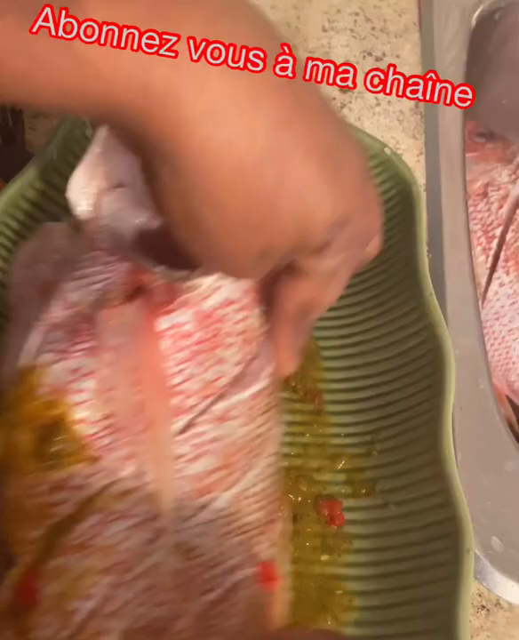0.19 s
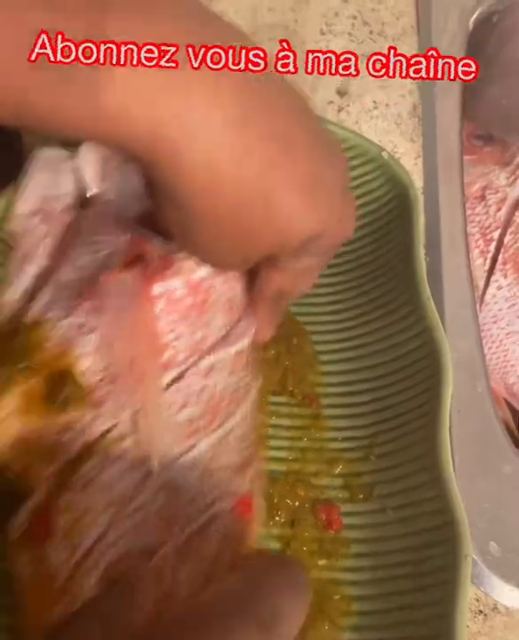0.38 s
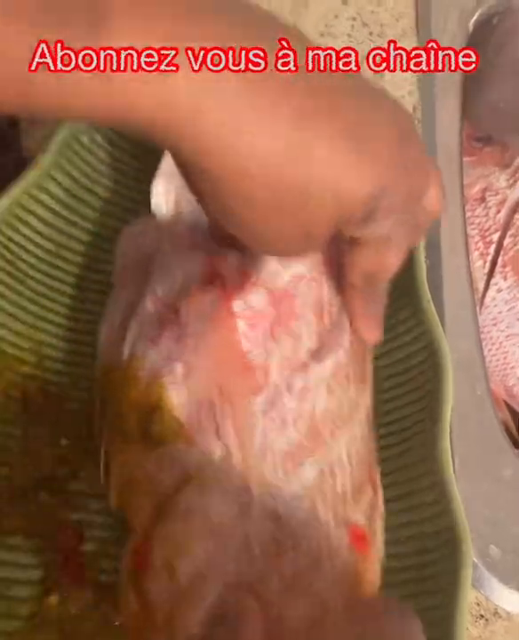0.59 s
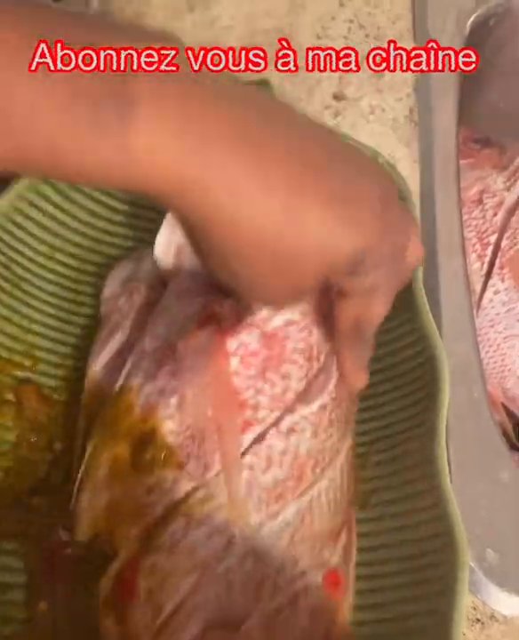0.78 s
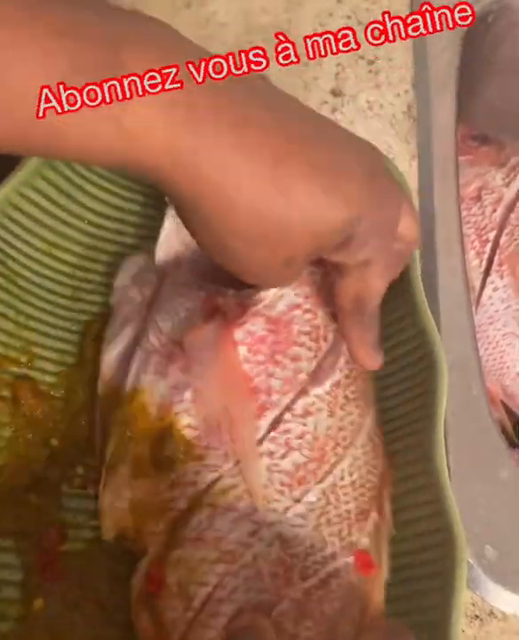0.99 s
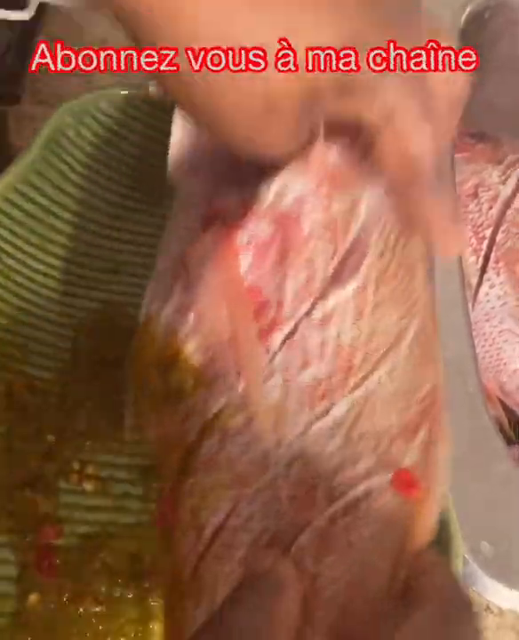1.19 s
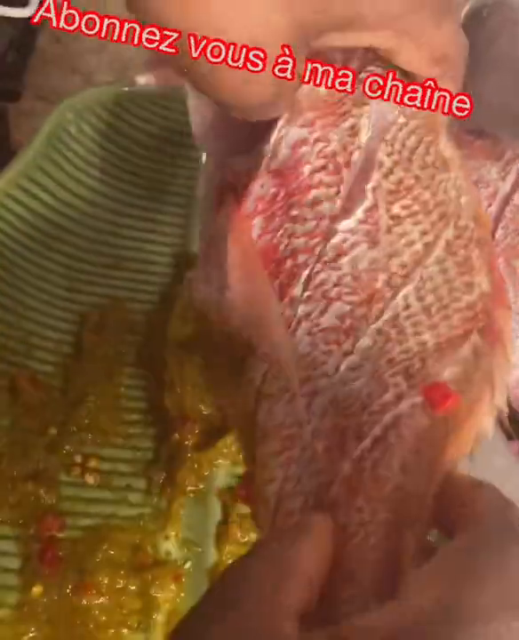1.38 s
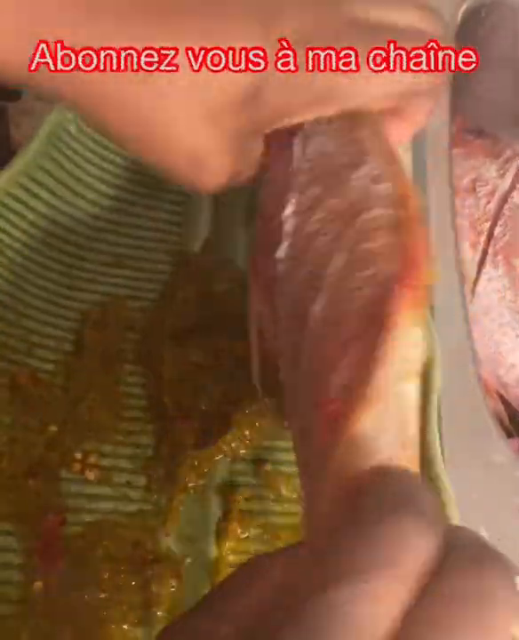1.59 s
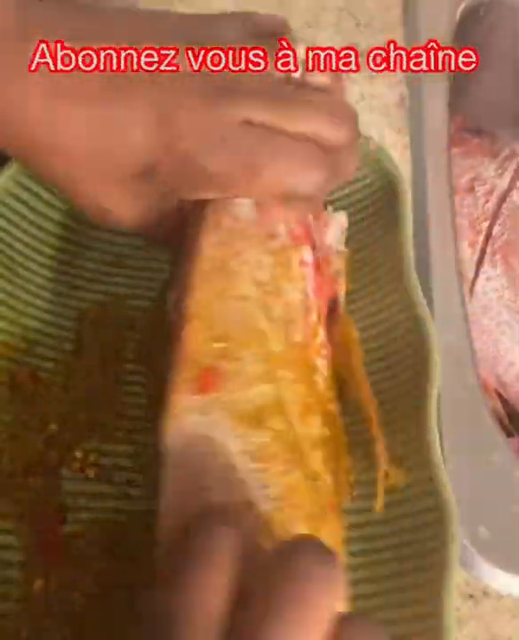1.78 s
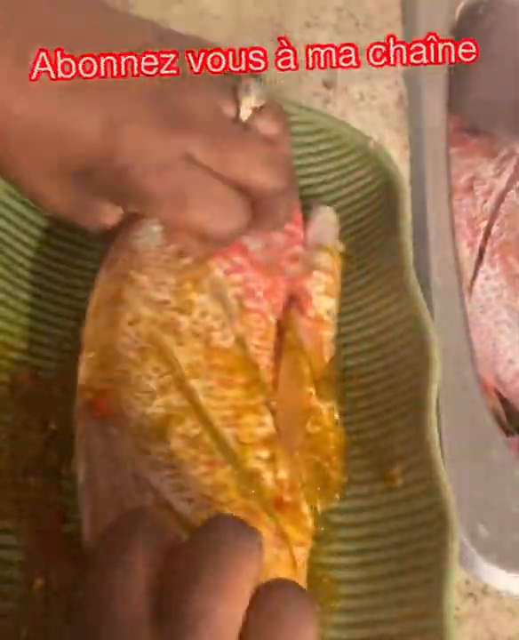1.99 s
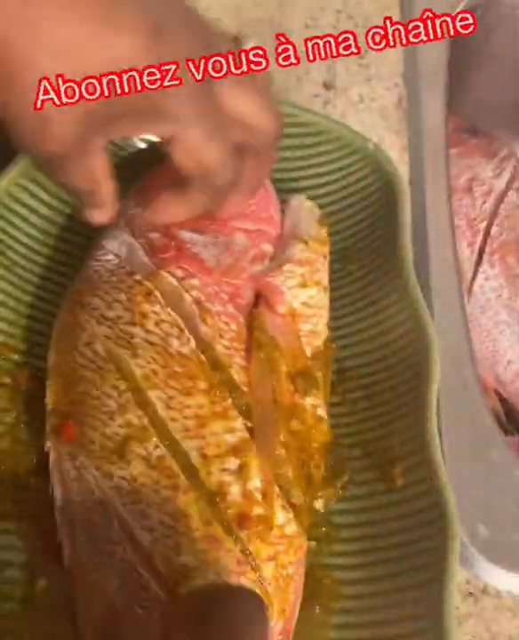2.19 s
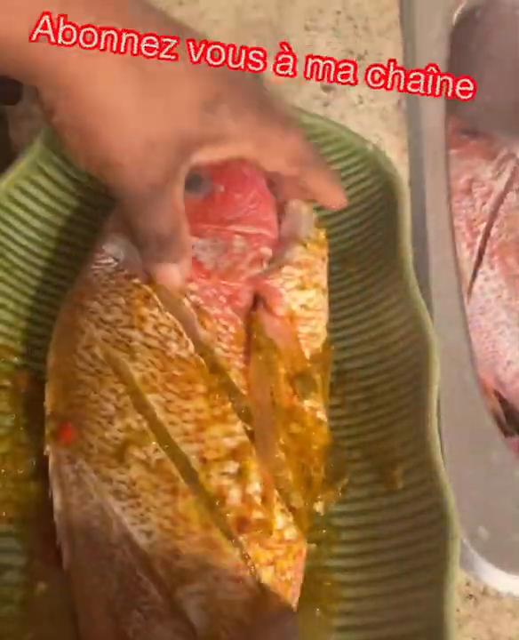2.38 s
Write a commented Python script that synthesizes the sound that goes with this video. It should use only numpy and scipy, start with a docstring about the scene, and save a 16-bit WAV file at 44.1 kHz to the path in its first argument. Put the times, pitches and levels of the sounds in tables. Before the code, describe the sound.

Wet, sticky squelching of a paste-covered fish handled on a plastic tray, close up in a small kitchen. A crisp squelch with pops comes at 0.2 s, a hollow tray knock with brief rattle at 0.3, the strongest juicy smack at 0.6, a short snap at 0.9. Then quieter: tiny squeaks around 1.6-1.8, faint clicks, a small wet pop at 2.1. Low hum and rumble continue throughout.

```python
"""A wet, paste-covered fish is shifted and turned over on a plastic tray in a small kitchen.
Air pockets pop (decaying sines), the sticky film snaps (noise bursts) and crackles (random rings),
the paste hisses (noise bands) and wet slits squeak (gliding tones). The tray knocks on the counter
(ringing modes) and rattles (noise); a motor hums (sines) over low room rumble and faint recorder
hiss (noise bands). Echoes are a noise tail; the microphone is a two-port phone."""
import sys
import numpy as np
from scipy import signal
from scipy.io import wavfile
from scipy.ndimage import uniform_filter1d

SR = 44100
rng = np.random.default_rng(int(sys.argv[2]) if len(sys.argv) > 2 else 0)


def to_wav(sig):
    """Store sig (one row per channel, or 1-D mono) as 16-bit WAV at the path in sys.argv[1].

    Samples outside -1..1 are clipped; the rate is SR.
    """
    pcm = np.clip(np.atleast_2d(sig), -1, 1) * 32767
    pcm = np.round(pcm).astype(np.int16)
    wavfile.write(sys.argv[1], SR, pcm.T)  # frames by channels


N = 110250
HALF_EACH_WAY = np.array([[0.5], [-0.5]])  # splits a left-right difference in dB

# tray rocks on the counter: t/s, relative level/dB, contact cut-off f/Hz
BLOWS = [(.294, -23, 3000), (.2975, -22.5, 342), (.301, -16, 800), (.307, -25.5, 498), (0.323, -29.5, 877),
         (.334, -32.5, 710), (.350, -30.5, 700), (0.394, -36, 400), (.628, -48.5, 896), (.910, -50, 600),
         (1.644, -46, 910), (2.306, -45.5, 300)]


def from_db(db):
    """dB to gain."""
    return 10 ** (np.asarray(db) / 20)


def rms_one(x):
    """Scale to rms 1."""
    return x / np.sqrt(np.mean(x ** 2) + 1e-20)


def in_time(rows):
    """Interpolate (s, dB) rows to a level in dB for every sample."""
    return np.interp(np.arange(N) / SR, *np.transpose(rows))


def at_hz(points, hz):
    """Read a spectrum on a log frequency axis."""
    points_hz, values = np.transpose(points)
    return np.interp(np.log(hz), np.log(points_hz), values)


def drift(corner_hz):
    """Noise through two equal poles, computed at SR / 40: slow chance of rms 1."""
    step, settle = 40, 2000
    r = np.exp(-2 * np.pi * corner_hz * step / SR)
    noise = rng.standard_normal(N // step + settle + 2)
    slow = signal.lfilter([1], [1, -2 * r, r * r], noise)[settle:]
    return np.interp(np.arange(N) / step, np.arange(len(slow)), rms_one(slow))


def ring(clicks, hz, t60_s):
    """Two-pole resonator: a unit click starts a decaying sine of initial height 1."""
    r = from_db(-60 / (t60_s * SR))
    w = 2 * np.pi * hz / SR
    return signal.lfilter([0, np.sin(w)], [1, -2 * r * np.cos(w), r * r], clicks + 1e-18)


def add(out, start_s, sound):
    """Mix a short sound in at a time."""
    i = int(start_s * SR)
    out[..., i:i + sound.shape[-1]] += sound[..., :N - i]


def banded(spectrum, flicker_db):
    """Third-octave stereo noise with set left-right likeness; bands share five flickers; rms 1."""
    # f/Hz, left-right correlation
    likeness = [(60, 1), (130, 0.79), (290, 0.76), (640, -0.058), (1410, 0.28), (3100, 0.21), (6820, 0.012),
                (15000, 0.14)]
    edges_hz = 22 * 2 ** np.arange(0, 9.7, 1 / 3)
    white = rng.standard_normal((2, 2, N + SR // 4))  # the extra 1/4 s lets the filters settle
    flickers = [drift(28) for _ in range(5)]
    out = 0
    for k, (low_hz, high_hz) in enumerate(zip(edges_hz, edges_hz[1:])):
        if low_hz <= spectrum[0][0]:
            continue
        band = signal.butter(2, [low_hz, high_hz], "band", fs=SR, output="sos")
        mid, side = signal.sosfilt(band, white[k % 2])[:, -N:]
        hz = np.sqrt(low_hz * high_hz)
        alike = at_hz(likeness, hz)
        gain = from_db(at_hz(spectrum, hz) + flicker_db * flickers[k // 2 % 5])
        out = out + gain * (np.sqrt(1 + alike) * mid + np.sqrt(1 - alike) * side * [[1], [-1]])
    return rms_one(out)


def noise_floor():
    """Low room rumble plus faint high recorder hiss: shaped noise bands, slightly stronger on the left."""
    # f/Hz, relative level/dB per Hz
    colour = [(20, -60), (32, -44), (50, -7.5), (75, -11), (120, -10.5), (160, -15.5), (250, -14.5),
              (380, -19), (500, -24), (900, -31), (1900, -42.5), (2800, -71.5), (6000, -67.5), (10000, -62),
              (16500, -56.5)]
    return from_db(-48.5) * banded(colour, flicker_db=0.48) * from_db([[0.4], [-0.4]])


def hum():
    """Motor hum: steady sines of random phase, slightly stronger on the left."""
    # f/Hz, rms level/dB before the left-right lean
    lines = [(59.2, -54.5), (86.1, -53), (118.4, -48.5), (220.7, -62), (355.3, -62.5)]
    t = np.arange(N) / SR
    total = 0
    for hz, db in lines:
        total = total + np.sqrt(2) * from_db(db) * np.sin(2 * np.pi * (hz * t + rng.random()))
    return total * from_db([[0.7], [-0.7]])


def kitchen(x):
    """Echoes: convolution with a decaying noise tail; bass common to both sides, treble dies sooner."""
    room_t60_s, treble_t60_s, rise_s = 0.32, 0.2, 0.0039
    wall_cut_hz, shared_bass_hz = 2400, 300
    t = np.arange(SR // 2) / SR
    noise = rng.standard_normal((2, len(t)))
    # swap the right side's bass for the left's
    bass = signal.lfilter(*signal.butter(2, shared_bass_hz, fs=SR), noise[0] - noise[1])
    noise[1] += bass
    low = signal.lfilter(*signal.butter(1, wall_cut_hz, fs=SR), noise)
    tail = low * from_db(-60 * t / room_t60_s) + (noise - low) * from_db(-60 * t / treble_t60_s)
    tail = tail * np.minimum(t / rise_s, 1)
    unit_tail = tail / np.sqrt(np.sum(tail ** 2) / 2)
    return signal.fftconvolve(x[None], unit_tail, axes=1)[:, :N]


def rattle():
    """Loose tray edge buzzes after each blow: decaying band noise, independent per side."""
    level_db, t60_s, band_hz = -1.5, 0.07, [550, 1720]
    out, t = np.zeros((2, N)), np.arange(4000) / SR
    for start_s, db, _ in BLOWS:
        noise = rng.standard_normal((2, len(t)))
        add(out, start_s, from_db(level_db + db - 60 * t / t60_s) * noise)
    return signal.sosfilt(signal.butter(2, band_hz, "band", fs=SR, output="sos"), out)


def tray():
    """Low-passed blows ring the modes of tray and counter; the right port hears them later."""
    # f/Hz, relative level/dB, t60/s, left-right difference/dB
    modes = [(64.4, -10, 0.32, 1), (113.15, -0.5, 0.32, 1.5), (155.9, -8, 0.3, 0.5),
             (189.5, -7.5, .2, -1.5), (229, -6, 0.074, 0), (246, -9, 0.13, -1), (291.4, -6, 0.24, -2),
             (329.3, -9, 0.14, -2.5), (374.8, 1.5, 0.085, -0.5), (436.5, -3.5, 0.056, -1.5),
             (516, -12, 0.022, 1.5), (627, -12, 0.085, 11), (680, 2.5, 0.015, 5.5), (914, -2.5, 0.086, 0.5),
             (1070, -4, 0.026, 1.5), (1190, -9.5, .06, 1), (1440, -4, 0.02, 2)]
    right_lag_s = 0.000091
    blows = np.zeros(N)
    click = np.eye(1, 600)[0]
    for start_s, db, cut_hz in BLOWS:
        soft_click = signal.lfilter(*signal.butter(2, cut_hz, fs=SR), click)
        add(blows, start_s, from_db(db) * soft_click)
    out = np.zeros((2, N))
    for k, (hz, db, t60_s, pan_db) in enumerate(modes):
        polarity = (-1) ** k
        out += polarity * from_db(db + HALF_EACH_WAY * pan_db) * ring(blows, hz, t60_s)
    left, right = out
    return np.array([left, np.interp(np.arange(N) - right_lag_s * SR, np.arange(N), right)])


def squeaks():
    """Air squeezed through a wet slit: gliding tones, two weak overtones, wavering height."""
    # t/s, length/s, nominal level/dB, first f/Hz, last f/Hz
    squeak_rows = [(1.616, .016, -50.5, 1947, 1530), (1.619, 0.038, -44.5, 1466, 1435),
                   (1.64, 0.032, -56, 1810, 1756), (1.669, 0.017, -62, 1430, 1400),
                   (1.683, .016, -56, 1420, 1435), (1.701, 0.014, -59, 1450, 1400),
                   (1.763, 0.016, -42.5, 1782, 1630)]
    edge_s, overtones_db, waver_db, lean_db = 0.0053, -23.5, 2.5, 2.5
    out = np.zeros(N)
    for start_s, length_s, db, first_hz, last_hz in squeak_rows:
        t = np.arange(int(length_s * SR)) / SR
        envelope = np.clip(np.minimum(t, length_s - t) / edge_s, 0, 1)
        phase = 2 * np.pi * (first_hz * t + (last_hz - first_hz) * t ** 2 / length_s / 2)
        overtones = np.sin(2 * phase) + np.sin(3 * phase)
        add(out, start_s, from_db(db) * envelope * (np.sin(phase) + from_db(overtones_db) * overtones))
    return out * from_db(waver_db * drift(160) + lean_db * np.array([[1], [-1]]))


def tack():
    """Fine wet hiss of the paste: flickering noise bands under a level curve."""
    # t/s, level/dB before trim
    levels = [(0.0, -50.5), (0.17, -71.5), (0.28, -54.5), (0.43, -63.5), (0.86, -68), (1.2, -76.5),
              (1.43, -84), (1.52, -67), (1.73, -74.5), (1.86, -68.5), (2.0, -68), (2.14, -69.5),
              (2.26, -73), (2.4, -69.5), (2.5, -71)]
    # f/Hz, relative level/dB per Hz
    colour = [(700, -36), (1500, 7.5), (3000, 0.5), (5000, -1.5), (8000, -8.5), (12000, -11), (16500, -7.5)]
    trim_db = 1.5
    return from_db(trim_db + in_time(levels)) * banded(colour, flicker_db=5)


def crackle():
    """Tiny bubbles burst at random times, pitches and places, each a short ring; rms 1."""
    # f/Hz, relative level/dB per Hz
    colour = [(400, -55), (900, -11), (2200, -5.5), (3700, -8), (6500, -4.5), (9500, -14.5), (12500, -30.5),
              (16000, -19)]
    bursts_per_s, t60_cycles, size_spread_db, side_spread_db = 4000, 14.0, 3.5, 5.6
    sizes = from_db(size_spread_db * np.minimum(rng.exponential(1, N), 2.5))
    sizes = sizes * rng.choice([-1, 1], N) * (rng.random(N) < bursts_per_s / SR)
    sizes = sizes * from_db(rng.normal(0, side_spread_db, N) * [[1], [-1]])
    pitches_hz = np.geomspace(500, 15500, 24)
    dealt = rng.integers(0, len(pitches_hz), N)
    out = np.zeros((2, N))
    for k, hz in enumerate(pitches_hz):
        gain = from_db(at_hz(colour, hz)) * hz  # hz offsets the shorter ring of high pitches
        out += gain * ring(sizes * (dealt == k), hz, t60_cycles / hz)
    return rms_one(out)


def squelches():
    """Dense crackle as the film parts, gated to each squelch."""
    # one list per squelch: t/s, level/dB before trim
    squelch_curves = [
        [(.194, -36), (.198, -35), (.204, -34), (.212, -28), (.223, -24.5), (.232, -37), (.24, -36),
         (.255, -49)],
        [(.572, -60), (.588, -45), (.590, -38), (.603, -41), (.608, -29.5), (.616, -35), (.625, -43),
         (.645, -45.5), (.655, -46.5), (.67, -57.5)],
        [(.885, -77), (.893, -43), (.897, -31.5), (.905, -33), (.911, -33), (.92, -50), (.935, -65)],
        [(2.06, -56), (2.076, -69), (2.098, -76), (2.107, -45), (2.118, -50), (2.135, -71)],
    ]
    trim_db = -4.5
    t = np.arange(N) / SR
    gain = np.zeros(N)
    for rows in squelch_curves:
        during = (t > rows[0][0]) * (t < rows[-1][0])
        gain += from_db(in_time(rows)) * during
    return from_db(trim_db) * gain * crackle()


def snaps():
    """The film snaps: milliseconds of dying noise through a band filter."""
    # t/s, peak level/dB, centre f/Hz
    snap_rows = [(0.164, -47, 12300), (.196, -39, 12600), (0.206, -38, 9500), (.210, -19, 8900),
                 (0.2125, -18, 9200), (0.222, -18.5, 8100), (.296, -48, 6900), (0.318, -41.5, 12000),
                 (0.332, -43, 13500), (.358, -47, 8200), (0.369, -40.5, 7700), (0.408, -47.5, 7800),
                 (0.578, -39.5, 9000), (0.589, -26.5, 8700), (0.605, -15, 7400), (0.6107, -13.5, 7800),
                 (0.614, -15, 8400), (0.6186, -33.5, 8900), (0.7772, -53.5, 6000), (0.85, -55, 7800),
                 (.894, -29.5, 8300), (0.8976, -27, 9800), (.9097, -24, 6640), (0.9132, -30, 8000),
                 (1.006, -38, 7600), (1.012, -38.5, 8700), (1.025, -44, 13000), (1.043, -50.5, 8000),
                 (1.068, -49, 12700), (1.098, -45, 14200), (1.2264, -52.5, 9900), (1.3567, -62.5, 12850),
                 (1.421, -55, 14000), (1.596, -40.5, 8200), (1.8093, -49, 13000), (1.820, -45.5, 11500),
                 (1.826, -48, 11900), (1.883, -48, 12000), (1.9, -40.5, 10200), (1.964, -48, 10900),
                 (1.9953, -51, 12200), (2.066, -54, 10000), (2.107, -32.5, 9000), (2.215, -48.5, 9050),
                 (2.299, -42.5, 11900), (2.333, -47, 8050), (2.345, -52, 9800), (2.394, -43, 7500),
                 (2.411, -59, 11040)]
    t60_s, half_width = 0.0099, 0.13  # half width as a share of the centre
    out, t = np.zeros(N), np.arange(800) / SR
    for start_s, db, hz in snap_rows:
        edges_hz = [hz * (1 - half_width), hz * (1 + half_width)]
        band = signal.butter(1, edges_hz, "band", fs=SR, output="sos")
        burst = signal.sosfilt(band, rng.standard_normal(len(t)) * from_db(-60 * t / t60_s))
        add(out, start_s, from_db(db) * burst / np.abs(burst).max())
    return out


def pops():
    """Air pockets pop: each rings, rising slightly in pitch, with wandering phase and rough height."""
    # t/s, nominal level/dB, starting f/Hz, t60/s, left-right difference/dB
    pop_rows = [(.002, -36.5, 1610, 0.026, 6), (0.1968, -35, 6430, 0.025, 3), (.1975, -29, 2230, 0.024, 5),
                (.1985, -32, 4070, 0.12, 4), (0.206, -33.5, 1324, 0.021, 1),
                (0.216, -26.5, 5200, 0.041, 11), (0.218, -31, 5810, 0.03, 21),
                (0.2241, -21, 3060, 0.019, 5), (0.2284, -28.5, 3196, 0.031, -4),
                (.232, -24, 3400, 0.013, 2), (.242, -37, 2250, .03, 8), (.296, -25.5, 3400, 0.0057, 7),
                (0.3581, -32.5, 2770, 0.0066, 2), (0.4734, -42, 3620, 0.012, 19.5),
                (.573, -49, 3960, .01, 7), (.577, -43, 3230, .012, 5), (.579, -44, 1900, 0.012, -3),
                (0.5906, -29.5, 4010, 0.032, 5.5), (.597, -32.5, 3910, 0.031, 4),
                (.6065, -17.5, 2308, 0.019, 2.5), (0.609, -21, 1940, 0.0095, -1),
                (.6115, -23, 4880, 0.013, 4.5), (0.616, -35, 2460, .025, -9), (.623, -28.5, 2180, 0.017, 7),
                (.626, -39.5, 527, 0.076, 1.5), (.628, -31.5, 936, 0.023, 3.5),
                (.628, -28, 2100, .011, 5.5), (0.6357, -22, 1950, .012, 6), (.643, -24, 5390, 0.0058, 5),
                (.643, -34, 1730, 0.018, 6.5), (0.647, -32.5, 4800, 0.018, 2),
                (0.651, -46.5, 1443, 0.082, 0), (.7128, -43, 5930, 0.012, 2), (.856, -52.5, 3690, .018, 4),
                (.887, -45, 3680, 0.015, 15.5), (0.8968, -16.5, 5230, 0.0072, 3.5),
                (0.9093, -16.5, 1880, 0.02, -4.5), (0.9103, -17.5, 5100, 0.0058, 4),
                (.900, -36, 3150, 0.018, 12), (.899, -39.5, 1000, 0.055, 1), (.905, -36, 990, 0.05, 1),
                (.927, -37, 954, 0.034, -3), (0.9154, -26.5, 1737, 0.024, 11),
                (1.009, -46, 3740, 0.02, -5.5), (1.648, -44.5, 953, 0.037, -8),
                (1.621, -54, 4330, 0.0086, -5), (1.629, -56.5, 3400, .015, 10),
                (1.692, -63, 4120, 0.016, 5), (1.8472, -44.5, 3080, 0.0062, 6),
                (1.852, -54.5, 1715, 0.023, -1), (1.8636, -46, 6250, 0.016, 2),
                (1.900, -55, 3600, 0.0073, 4), (1.907, -44, 2150, 0.0068, 6), (1.908, -51.5, 3520, .012, 8),
                (1.911, -50.5, 1610, 0.021, 1), (1.965, -59, 3420, 0.016, 19),
                (2.0382, -54, 3500, .012, 22), (2.065, -53, 4530, 0.012, 5), (2.074, -46, 2110, 0.047, 3),
                (2.0749, -47.5, 1514, 0.052, 7.5), (2.078, -53.5, 926, 0.31, 1),
                (2.1088, -30, 1230, 0.0063, -5), (2.109, -42, 2900, 0.0044, 2),
                (2.1167, -29.5, 3850, 0.0097, 5), (2.130, -62, 3870, 0.098, 5),
                (2.216, -56, 3460, 0.022, 5), (2.3043, -48.5, 1534, 0.021, 0),
                (2.304, -48.5, 4700, 0.0085, 3), (2.314, -53.5, 3300, 0.025, 6),
                (2.340, -54, 3440, 0.022, 5), (2.362, -51, 3300, 0.011, 4), (2.411, -50.5, 3830, .02, 5.5),
                (2.4745, -51, 8400, 0.018, -15)]
    roughness = 0.6
    wander = 0.35  # random walk of the phase, radians per root of a cycle
    lag_s_per_db = 0.00001  # right port later, per dB of lean to the left
    out, t = np.zeros((2, N)), np.arange(4000) / SR
    for start_s, db, hz, t60_s, pan_db in pop_rows:
        noise = rng.standard_normal(len(t))
        rough = 1 + roughness * rms_one(uniform_filter1d(noise, size=24))
        port_t = t + lag_s_per_db * pan_db * HALF_EACH_WAY
        phase_walk = wander * np.sqrt(hz / SR) * np.cumsum(noise[::-1])
        tone = np.sin(2 * np.pi * hz * port_t * (1 + 0.35 * t) + phase_walk)
        envelope = (1 - np.exp(-t * hz)) * from_db(-60 * t / t60_s)  # swells over about a cycle
        add(out, start_s, from_db(db + HALF_EACH_WAY * pan_db) * tone * envelope * rough)
    return out


def scene():
    """Fish and tray with their echoes, over hum and noise floor."""
    room_db, tray_room_db = -10, -4  # the tray is heard mostly through the counter
    fish = pops() + snaps() + squelches() + tack() + squeaks()
    knock = tray() + rattle()
    to_room = (fish + from_db(tray_room_db) * knock).mean(axis=0)
    return fish + knock + from_db(room_db) * kitchen(to_room) + hum() + noise_floor()


def record(dry):
    """Treble comes from the right port, late and inverted on the left plus a little of its own."""
    one_port_hz, cutoff_hz = 6300, 16650
    left_lag_samples, left_own_share = 10, 0.23
    low = signal.sosfiltfilt(signal.butter(6, one_port_hz, fs=SR, output="sos"), dry)
    left_high, right_high = dry - low
    late = -np.concatenate([np.zeros(left_lag_samples), right_high[:-left_lag_samples]])
    both = low + np.array([late + left_own_share * left_high, right_high])
    return signal.sosfilt(signal.cheby2(14, 70, cutoff_hz, fs=SR, output="sos"), both)


dry = scene()
out = record(dry)
to_wav(out)
```